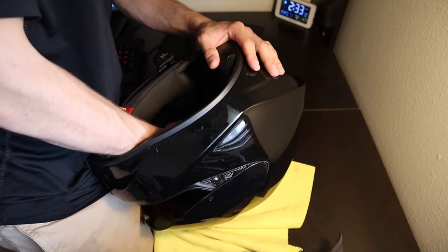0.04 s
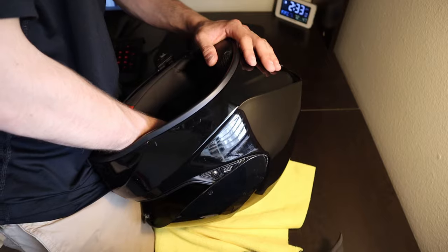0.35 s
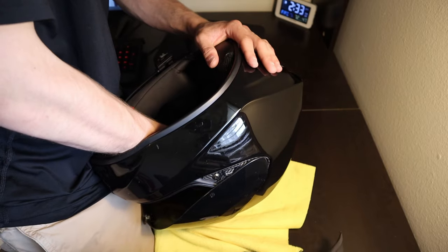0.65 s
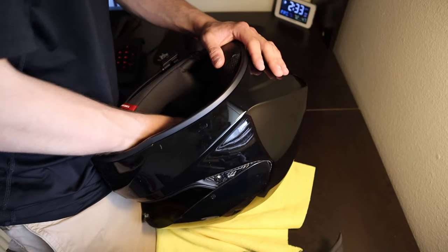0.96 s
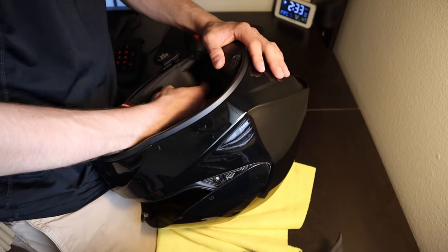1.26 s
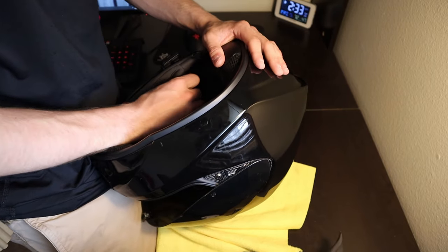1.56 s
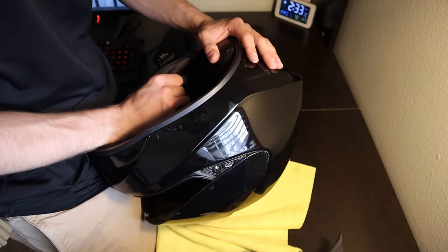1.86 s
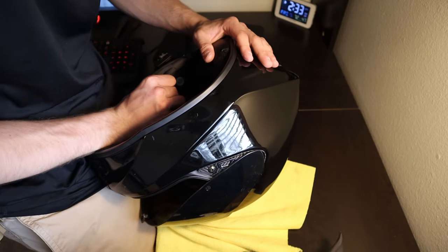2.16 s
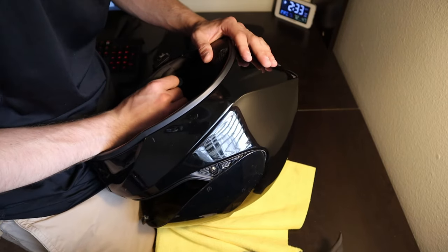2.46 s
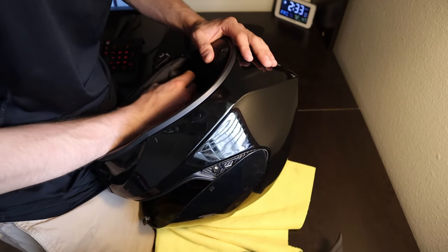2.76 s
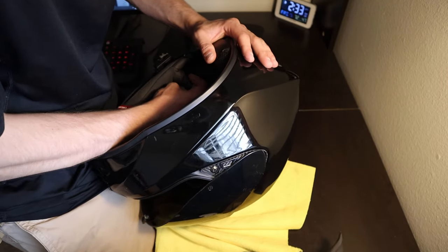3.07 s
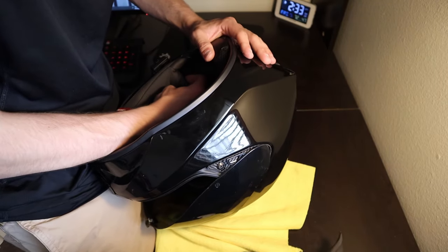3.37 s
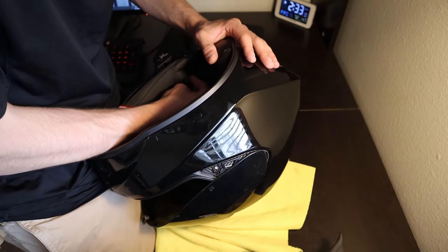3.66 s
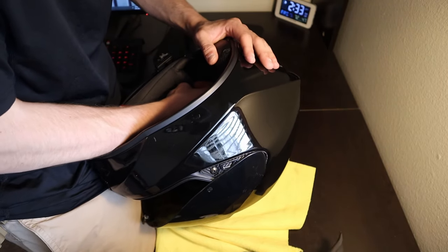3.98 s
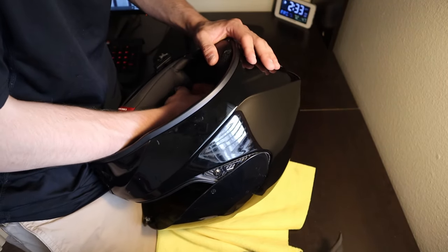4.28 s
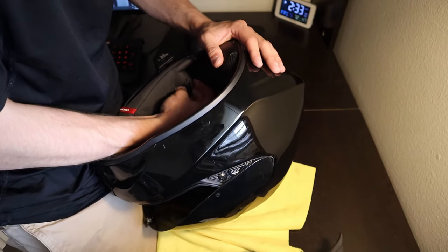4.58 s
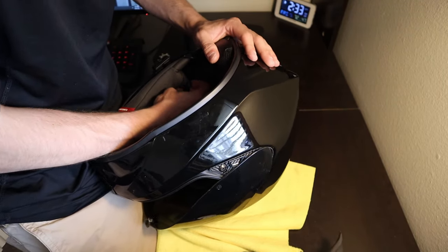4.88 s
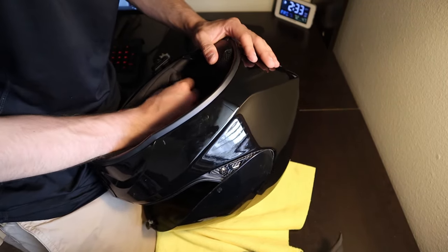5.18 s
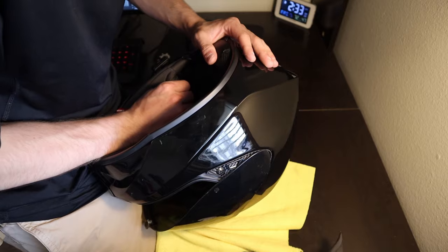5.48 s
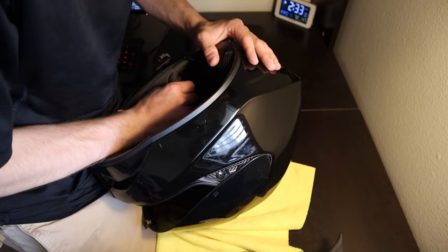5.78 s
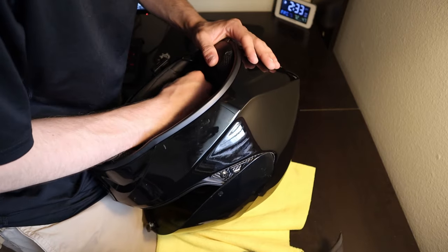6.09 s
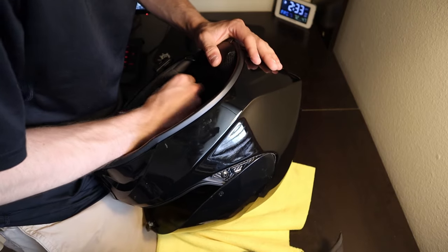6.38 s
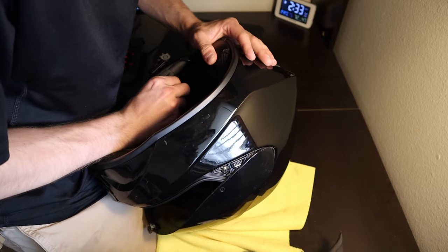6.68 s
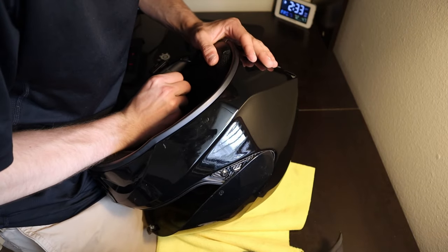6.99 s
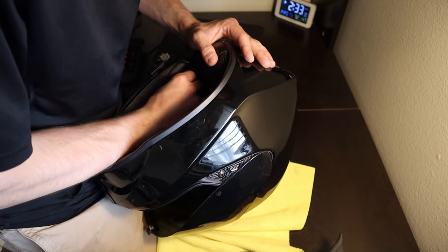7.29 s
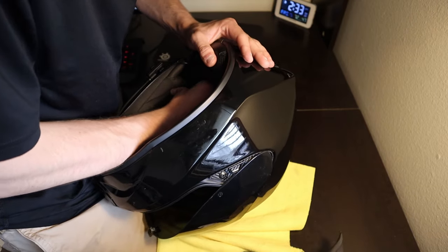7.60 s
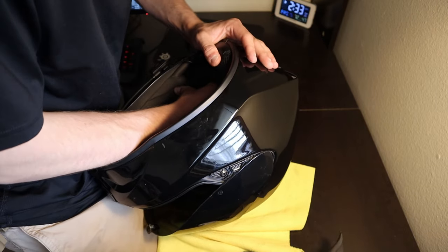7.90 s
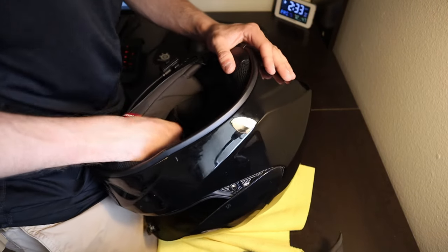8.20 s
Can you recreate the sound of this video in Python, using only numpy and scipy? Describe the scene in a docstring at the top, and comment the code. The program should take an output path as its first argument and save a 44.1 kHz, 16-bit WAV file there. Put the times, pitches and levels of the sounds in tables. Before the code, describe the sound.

Soft, close rustling of fabric and foam runs in irregular strokes as a liner is worked into a helmet. A dull bump and a loud plastic snap come within the first second, briefly ringing the shell. Small crinkles, short scrapes and light bumps follow, then a second, slightly softer snap just before the end. The room is small and quiet, with a faint ventilation drone.

```python
"""In a small room, close by, a hand presses the padding into a motorcycle helmet.
Fabric rubs and scrapes over foam by catching and slipping, and the liner's plastic backing crinkles
as its creases give way. The pad seats with a thud, the helmet rocks, and two plastic studs snap home,
one early and one late, ringing the shell. Ventilation drones faintly throughout."""
import sys
import numpy as np
from scipy import signal
from scipy.fft import rfft, irfft, next_fast_len
from scipy.io import wavfile
from scipy.ndimage import map_coordinates

SR = 44100
rng = np.random.default_rng(int(sys.argv[2]) if len(sys.argv) > 2 else 0)


def bounce(signal):
    """Save signal as a 16-bit WAV file at the path given by the first command-line argument."""
    frames = np.transpose(np.atleast_2d(signal))
    limited = np.clip(frames, -1, 1)
    pcm = np.round(limited * 32767).astype(np.int16)
    wavfile.write(sys.argv[1], SR, pcm)


N = 363825

# tone of the ventilation: pitch_hz, gain_db
AIR_TONE = [(20, 2), (45, 0), (80, -6), (130, 1.5), (175, -6), (340, -4.5), (430, -4), (560, -9),
            (1050, -9.5), (1600, -13.5), (2500, -16.5), (5000, -18), (8500, -21), (12500, -19.5)]
# how long the room's echoes take to fade by 60 dB: pitch_hz, fade_s
ROOM_FADE = [(100, .4), (300, .42), (1000, .36), (3000, 0.21), (7000, 0.27), (12000, .17)]
# tone of the room's answer to the handling: pitch_hz, gain_db
WALL_TONE = [(100, -3), (300, 2), (1000, -1), (3000, 0), (8500, 0), (11000, -6.5), (15000, -9.5)]
# hand strokes (palm = weight on the foam, edge = tautness): start_s, length_s, level_db, palm_db, edge_db
STROKES = [(0, 0.25, -66, -1, -3), (0.276, 0.062, -68.5, -4, 2), (.36, 0.14, -63.5, 4, -0.5),
           (0.558, .06, -65.5, 3.5, -11), (0.661, 0.08, -61.5, -2, -4), (0.832, 0.17, -57, -10, -2.5),
           (1.021, 0.1, -58.5, -9, 0), (1.131, 0.25, -63.5, -2, -1), (1.391, 0.16, -67, 2.5, 1),
           (1.61, 0.089, -68.5, 7.5, 3), (2.48, 0.19, -73, 8, 4), (2.719, 0.13, -62.5, -8, 4.5),
           (2.9, .11, -60, -9.5, 5.5), (3.03, 0.22, -66.5, -4, 2), (3.289, .21, -67.5, -3, -2),
           (3.518, 0.22, -63, -4.5, 1.5), (3.78, 0.051, -61.5, -6.5, -2), (3.948, 0.111, -61, -2.5, 1),
           (4.317, 0.074, -60, -7, 1), (4.457, 0.21, -61.5, -5.5, -0.5), (4.799, .05, -64, -9, -1),
           (4.938, 0.067, -62.5, -10.5, 4), (5.028, 0.12, -58.5, -7, -9), (5.179, 0.2, -71, -7, 5.5),
           (5.683, .17, -75, 3, 4), (5.876, 0.31, -68.5, -6, 4), (6.198, .12, -70, 5.5, 3),
           (6.428, 0.075, -61, -10, 0), (6.52, .12, -65, -6, -6), (6.64, 0.081, -73.5, 6.5, 5),
           (7.074, .1, -61.5, -4, -1), (7.2, 0.23, -63, -6, -2), (7.47, 0.38, -66.5, -1.5, -2),
           (7.919, 0.12, -60, -12.5, -1.5), (8.032, .24, -59.5, -5, 5)]
# the hand is never quite still: foam_db, cloth_db, fibre_db
RESTING_LEVELS = (-76, -77, -83)
# how deep the hand is in the helmet: time_s, depth_0_to_1
HAND_DEPTH = [(1.9, 0.06), (2.5, 0.23), (2.75, 0.63), (3.45, 0.53), (3.65, 0.32), (5.3, .35), (5.85, 0.64),
              (6.55, 0.64), (7.3, 0.5), (7.5, 0.4), (8.25, 0.39)]
# tones of rubbed foam, cloth and fibres: pitch_hz, gain_db
FOAM_TONE = [(25, -5), (80, -9), (130, -3.5), (250, -3.5), (420, -0.5), (620, -9), (1200, -22.5),
             (4000, -60.5)]
CLOTH_TONE = [(150, -32.5), (450, -10), (750, -2), (1100, 0.5), (1600, -2), (2400, -4.5), (3500, -10.5),
              (6000, -22.5), (14000, -45.5)]
FIBRE_TONE = [(800, -39.5), (2500, -9), (4000, 1), (7000, -2), (8600, 1.5), (9800, -10), (12500, -10),
              (13600, -23), (16000, -32)]
# notes of the air inside the helmet: pitch_hz, width_hz, gain_db
HOLLOW_NOTES = [(410, 66, -5), (920, 110, -6), (998, 100, 1), (1370, 300, -13)]
# the liner's larger creases buckling (edge = sharpness): start_s, gain_db, edge_db
BIG_CREASES = [(.0354, -56, 1), (.089, -57, 0), (.116, -54.5, 0), (.1815, -58, -1), (.411, -53, -8),
               (.4314, -43, -1), (.466, -58, 17), (.598, -57, -13), (.6599, -57, -7), (1.0289, -64.5, -3),
               (1.0594, -51.5, -7), (1.0782, -52, 6), (1.1045, -63, 6), (1.1419, -60, 5),
               (1.1857, -48, -1.5), (1.2026, -49.5, -4), (1.271, -56.5, -3.5), (1.3498, -50, 1.5),
               (1.5, -53.5, 2.5), (1.7032, -51, 0), (1.8179, -56.5, 4), (1.8289, -52, -2),
               (2.0553, -60, 1.5), (2.7771, -58, 0), (3.0727, -57, 2.5), (3.1605, -55.5, 3.5),
               (3.3139, -60.5, 2.5), (3.3759, -56, -0.5), (3.4857, -62, -5.5), (3.5877, -58, -12.5),
               (3.6228, -52.5, -7), (3.6777, -54, 2.5), (3.7112, -54.5, 1.5), (3.7718, -55.5, -2),
               (3.8659, -58, 0.5), (3.8751, -58, -1.5), (3.977, -52.5, -3), (4.0333, -53.5, 1),
               (4.0983, -52, -0.5), (4.424, -53.5, 1), (4.5275, -59.5, -1.5), (4.6132, -48, -1.5),
               (4.838, -58, 1), (5.0955, -51.5, 0.5), (5.334, -53, 1), (5.9864, -50, -3), (6.8164, -57, 6),
               (6.847, -52.5, 7.5), (7.0882, -57, 0.5), (7.156, -58, 3), (7.2718, -53.5, 2.5),
               (7.2906, -60.5, 0), (7.3228, -59, 9), (7.3421, -53, 1.5), (7.36, -54.5, -7),
               (7.4797, -56, 2), (7.5799, -53.5, -1), (7.7497, -59, -14), (7.76, -57.5, -2),
               (8.1715, -55, 4)]
# tones of a crease's woody body, middle and sharp edge: pitch_hz, gain_db
BODY_TONE = [(120, -26), (350, -13), (700, -3.5), (1100, -1), (1450, -3.5), (2200, -22.5), (5000, -60.5)]
MIDDLE_TONE = [(600, -35), (1100, -13.5), (1500, -2), (2200, 2), (2900, -3.5), (3700, -7), (5000, -18),
               (10000, -54.5)]
EDGE_TONE = [(1800, -34.5), (3200, -10), (4300, -0.5), (6500, -2), (8700, -1), (10200, -10), (13000, -11.5),
             (14000, -18), (15500, -26)]
# fingers dragging over the fabric: middle_s, half_length_s, level_db, edge_db
SCRAPES = [(0.13, 0.027, -53, 1), (0.448, 0.025, -47, -1), (3.076, 0.015, -53.5, -6),
           (3.826, 0.016, -44, -1), (4.046, .016, -54, 0), (4.631, 0.018, -41.5, -0.5),
           (5.13, 0.026, -50.5, 0.5), (5.155, 0.016, -47, -0.5), (6.218, 0.023, -57, 7.5),
           (7.502, 0.015, -49, -13.5), (7.556, 0.035, -52, 0)]
# tone of a drag: pitch_hz, gain_db
SCRAPE_TONE = [(120, -47), (200, -12), (647, -7), (849, -1), (1360, -5), (1630, -6.5), (2250, -9.5),
               (2800, -18), (3670, -15), (4720, -23.5), (8260, -23.5), (13000, -37), (15000, -39)]
# the pad seating against the shell: start_s, gain_db
THUDS = [(0.433, -23), (0.449, -38), (0.468, -37), (1.199, -43), (1.487, -50.5), (6.203, -48),
         (6.255, -51.5), (7.551, -45.5), (7.685, -55), (8.08, -48)]
# notes of the struck pad: pitch_hz, fade_s, gain_db
PAD_NOTES = [(148.1, 0.045, -7), (225, 0.03, -2), (330, .03, -2), (510, .025, -5)]
# the helmet rocking on the lap: start_s, level_db, pitch_hz, length_s
ROCKS = [(0.432, -49.5, 62.4, 0.068), (0.502, -54.5, 47.7, 0.13), (0.726, -47, 104, 0.052),
         (0.82, -57, 45.7, 0.12), (3.628, -63, 70.6, 0.093), (4.6, -64.5, 54.8, 0.067),
         (7.785, -51, 100.8, 0.069)]
# studs snapping home: start_s, ring_db, crack_db, travel_scale_s, shiver_db, echo_db, echo_treble_db
SNAPS = [(0.7282, 2, 15, .0028, -7, 14, 0), (7.7828, 1, 3, 0.00119, -19.5, 8, -8)]
# notes of the shell: pitch_hz, fade_s, first_stud_db, second_stud_db
SHELL_NOTES = [(305, .045, -18, -24), (492, .024, -11, -16.5), (883, 0.028, -5, -11),
               (1114, 0.031, -11.5, -19), (1288, 0.02, -7.5, -21), (1555, 0.015, -18.5, -16.5),
               (1860, 0.012, -21.5, -20), (2280, .012, -26, -13.5), (2570, 0.018, -6.5, -28),
               (2900, 0.02, -17, -22), (3350, 0.027, -14, -33.5), (3600, 0.0075, -18, -31.5),
               (4080, 0.012, -20.5, -17), (5114, 0.0074, -20, -28), (6300, .009, -11.5, -30),
               (6640, 0.0099, -15, -44), (8500, 0.012, -16, -34)]
# how well the shell passes its ringing to the air: pitch_hz, gain_db
SHELL_TONE = [(40, -8), (150, -3), (280, -1), (520, 0), (670, -6), (850, 0)]
# tones of a stud's crack and of its echo off the walls: pitch_hz, gain_db
CRACK_TONE = [(60, -8), (200, -5), (900, -2.5), (3000, 0), (4200, -0.5), (6300, 2), (7500, -2), (8700, -2),
              (10500, -10), (14000, -7), (15500, -15)]
SNAP_ECHO_TONE = [(50, -18.5), (150, -8), (300, 5.5), (450, 1), (680, 1.5), (950, 6), (1350, 4.5),
                  (1900, -1), (2600, 0.5), (4500, -4), (6300, -4.5), (8700, -9), (10500, -16),
                  (15000, -19.5)]


def amp(db):
    """Turn decibels into a gain."""
    return 10 ** (np.asarray(db) / 20)


def unit(x):
    """Scale x to an average power of 1."""
    return x / np.sqrt(np.mean(x ** 2) + 1e-20)


def along(points, hz):
    """Read between (pitch_hz, value) points on a log pitch scale."""
    pitches, values = np.transpose(points)
    return np.interp(np.log(hz + 1), np.log(pitches + 1), values)


def filtered(x, response):
    """Scale each frequency in x by response(hz)."""
    size = next_fast_len(len(x) + 8192)
    return irfft(rfft(x, size) * response(np.fft.rfftfreq(size, 1 / SR)), size)[:len(x)]


def coloured(x, points, size=1024):
    """Give x the tone drawn by (pitch_hz, gain_db) points."""
    cepstrum = irfft(np.log(amp(along(points, np.fft.rfftfreq(size, 1 / SR)))))
    cepstrum[1:size // 2] *= 2
    cepstrum[size // 2 + 1:] = 0  # so the filter never rings ahead of the sound
    return signal.fftconvolve(x, irfft(np.exp(rfft(cepstrum))))[:len(x)]


def add(track, s, sound):
    """Mix a sound into the track from time s."""
    part = track[max(0, round(s * SR)):][:len(sound)]
    part += sound[:len(part)]


def ventilation():
    """Moving air makes a steady hiss and a low, narrow drone."""
    air = filtered(rng.standard_normal(N), lambda hz: amp(along(AIR_TONE, hz)) * (hz < 12850))
    drone = filtered(rng.standard_normal(N), lambda hz: 1 / (1 + ((hz - 242) / 15) ** 2))
    return amp(-68.5) * unit(air) + amp(-74) * unit(drone)


def depth_at(s):
    """How deep the hand is inside the helmet, 0-1."""
    return np.clip(np.interp(s, *np.transpose(HAND_DEPTH)), 0, 1)


def stroke_levels(rim_rise_s=0.0091, fall_s=0.013):
    """Foam, cloth and fibre levels in dB: each stroke rises, holds and dies away."""
    powers, t = np.outer(amp(RESTING_LEVELS) ** 2, np.ones(N)), np.arange(SR // 2) / SR
    for s, length, db, palm_db, edge_db in STROKES:
        rise_s = rim_rise_s * np.exp(2.2 * depth_at(s))  # slower over the soft crown
        shape = (1 - np.exp(-(t / rise_s) ** 2)) * np.exp(-np.maximum(t - length, 0) / fall_s)
        for layer, gain in zip(powers, amp([db + palm_db, db, db - 9.5 + edge_db])):
            add(layer, s, (gain * shape) ** 2)
    return 10 * np.log10(powers)


def wobble(rate):
    """A smooth curve through `rate` random points a second."""
    points = rng.standard_normal(int(N * rate / SR) + 4)
    return map_coordinates(points, [np.arange(N) * rate / SR])


def slips(size, per_s, spread_db, smooth):
    """A surface catches and slips: tiny uneven clicks over some smooth hiss."""
    hits = rng.random(size) < per_s / SR
    signs = np.sign(rng.standard_normal(size))
    strengths = amp(spread_db * np.clip(rng.standard_normal(size), -2, 2))
    return unit(unit(hits * signs * strengths) + smooth * rng.standard_normal(size))


def hollow(x, strength):
    """The air inside the helmet rings along with whatever moves in it."""
    def ringing(hz):
        return sum(amp(db) * 1j * hz * width / (pitch ** 2 - hz ** 2 + 1j * hz * width)
                   for pitch, width, db in HOLLOW_NOTES)
    return filtered(x, lambda hz: 1 + strength * ringing(hz))


def rubbing(foam_db, cloth_db, fibre_db):
    """Foam murmurs, cloth catches and fibres hiss under one unsteady hand; deeper cloth sounds hollow."""
    depth = depth_at(np.arange(N) / SR)
    grip = wobble(84) + .6 * wobble(18)
    outer, inner = [coloured(slips(N, per_s=610, spread_db=4.5, smooth=0.71), CLOTH_TONE)
                    for _ in range(2)]
    cloth = np.sqrt(1 - depth) * unit(outer) + np.sqrt(depth) * unit(hollow(inner, strength=7.9))
    foam = unit(coloured(rng.standard_normal(N), FOAM_TONE))
    fibre = unit(coloured(slips(N, per_s=1600, spread_db=4, smooth=1.5), FIBRE_TONE))
    return (amp(foam_db + 0.72 * grip) * foam + amp(cloth_db + grip) * cloth
            + amp(fibre_db + 1.2 * grip) * fibre)


def small_creases(count=12, gap_s=.03, fade_db_per_s=22):
    """Each stroke sets off an uneven, fading run of little creases, listed like BIG_CREASES."""
    rows = []
    for start, length, db, _, edge_db in STROKES:
        gaps, sizes = rng.uniform(0, 2, count), rng.uniform(-1, 1, count)
        ages = gap_s * (np.cumsum(gaps) - gaps[0]) + 0.0091  # from when the stroke takes hold
        for age, size in zip(ages, sizes):
            if age < length:
                lift_db = 2.5 - 14 * depth_at(start) - fade_db_per_s * age  # quieter deep inside
                rows.append((start + age, db + lift_db + 3 * size, edge_db))
    return rows


def crinkles(creases, typical_buckle_s=.0019):
    """A crease gives way in a quick run of slips; the low part rings the helmet's hollow."""
    out, t = np.zeros(N), np.arange(SR // 16) / SR
    for s, db, edge_db in creases:
        progress = t / (typical_buckle_s * np.exp(0.2 * rng.standard_normal()))
        shape = np.sqrt(progress) * np.exp(-progress) + 0.036 * np.exp(-t / .008)
        run = slips(len(t), per_s=5500, spread_db=4, smooth=.5) * shape
        body = hollow(coloured(run, BODY_TONE), strength=0.61)
        middle, edge = coloured(run, MIDDLE_TONE), coloured(run, EDGE_TONE)
        woody_db = -2 + 9 * depth_at(s) - .25 * edge_db  # deep creases are woodier, sharp ones thinner
        for band, band_db in (body, woody_db), (middle, -woody_db), (edge, edge_db - 9):
            add(out, s, amp(db + band_db - 8) * unit(band))
    return out


def scrapes():
    """A finger drags in a short swell of slips, brighter when the fabric is taut."""
    out, t = np.zeros(N), np.arange(-SR // 8, SR // 8) / SR
    for middle_s, half_s, db, edge_db in SCRAPES:
        drag = slips(len(t), per_s=900, spread_db=2, smooth=0.38)
        drag = hollow(coloured(drag, SCRAPE_TONE), strength=0.664)
        drag = unit(coloured(drag, [(1500, 0), (5000, edge_db)]))
        add(out, middle_s + t[0], drag * amp(db) * np.exp(-(t / half_s) ** 2))
    return out


def rocking():
    """After a push the whole helmet rocks, making a brief, deep swell."""
    out, t = np.zeros(N), np.arange(SR // 4) / SR
    for s, db, hz, length in ROCKS:
        swell = np.sin(np.pi * np.minimum(t / length, 1))
        add(out, s, amp(db) * np.sin(2 * np.pi * hz * t) * swell)
    return out


def ring(notes, t, rise_s):
    """Notes struck together each drop 60 dB in fade_s; neighbours swing opposite ways."""
    ringing = sum((-1) ** k * amp(db - 60 * t / fade_s) * np.sin(2 * np.pi * hz * t)
                  for k, (hz, fade_s, db) in enumerate(notes))
    return ringing * (1 - np.exp(-t / rise_s))


def thuds():
    """The pad bumps the shell, and its low notes die quickly."""
    out, t = np.zeros(N), np.arange(SR // 4) / SR
    for s, db in THUDS:
        add(out, s, amp(db) * ring(PAD_NOTES, t, rise_s=0.00037))
    return out


def crack(size, travel_scale_s):
    """A stud's lip jumps the rim; the blow bends through the shell, treble ahead of bass."""
    hz = np.fft.rfftfreq(size, 1 / SR)
    delay_s = travel_scale_s * (np.sqrt(1000 / (hz + 300)) - np.sqrt(2000 / SR))
    pulse = irfft(np.exp(-2j * np.pi * np.cumsum(delay_s) * SR / size), size)
    return pulse * np.exp(-np.arange(size) / SR / .03)  # fade to one short click, no stray tick after


def snaps():
    """Each stud cracks into its socket; the shell rings and throws the sound round the room."""
    out, t = np.zeros(N), np.arange(SR // 2) / SR
    for stud, (s, ring_db, crack_db, travel, shiver_db, echo_db, treble_db) in enumerate(SNAPS):
        notes = [(hz, fade_s, stud_dbs[stud]) for hz, fade_s, *stud_dbs in SHELL_NOTES]
        add(out, s, amp(ring_db) * coloured(ring(notes, t, rise_s=0.00014), SHELL_TONE))
        # the shell's countless high notes blur into a shiver of noise
        shiver = amp(shiver_db - 60 * t / .02) * rng.standard_normal(len(t))
        add(out, s, coloured(amp(crack_db) * crack(len(t), travel) + shiver, CRACK_TONE))
        walls = coloured(echoes(early_db=2.5, early_fade_s=.08), SNAP_ECHO_TONE)
        add(out, s, amp(echo_db - 3) * coloured(walls, [(1500, 0), (9000, treble_db)]))
    return out


def echoes(early_db, early_fade_s):
    """Dense echoes off desk and wall, then a tail that dies faster in the treble."""
    hz, t, spectrum = signal.stft(rng.standard_normal(SR // 2), SR, nperseg=256)
    fade = amp(-60 * t / along(ROOM_FADE, hz)[:, None])
    tail = signal.istft(spectrum * fade, SR, nperseg=256)[1]
    t = np.arange(len(tail)) / SR
    tail *= 1 + amp(early_db - 60 * t / early_fade_s)
    tail *= 1 - np.exp(-(t / 0.0038) ** 2)  # echoes take a moment to build
    return tail / np.linalg.norm(tail)


def scene():
    """Mix the handling, its echo, the snaps and the ventilation in one channel."""
    handling = rubbing(*stroke_levels()) + scrapes() + rocking() + thuds()
    handling += crinkles(BIG_CREASES + small_creases())
    walls = coloured(echoes(early_db=4, early_fade_s=0.081), WALL_TONE)
    echo = amp(-12.5) * signal.fftconvolve(handling, walls)[:N]
    return (handling + echo + snaps() + ventilation())[None]


def record(dry):
    """The microphone clips at full scale and cuts off the highest treble."""
    clipped, top_hz = np.clip(dry[0], -1, 1), 15900
    return filtered(clipped, lambda hz: 1 / np.sqrt(1 + (hz / top_hz) ** 120))[None]


dry = scene()
out = record(dry)
bounce(out)
```